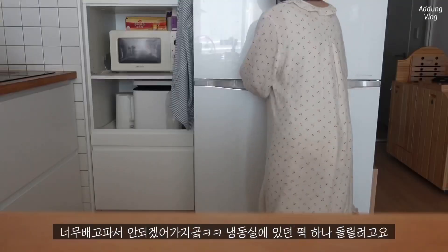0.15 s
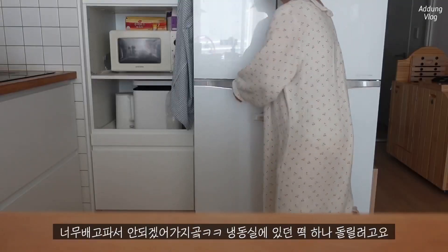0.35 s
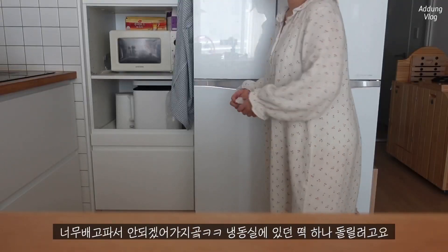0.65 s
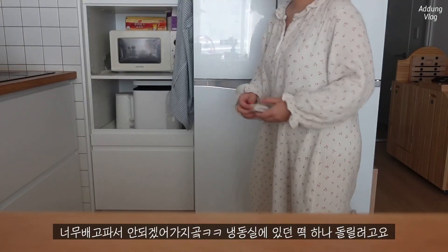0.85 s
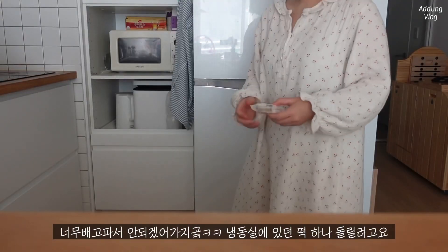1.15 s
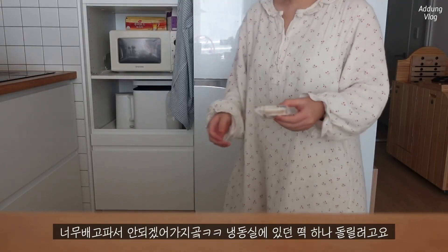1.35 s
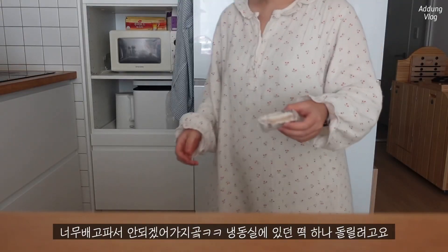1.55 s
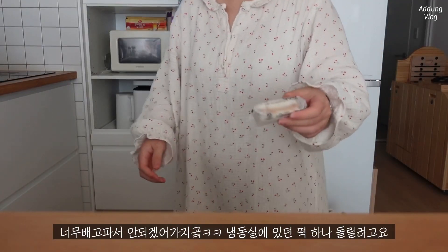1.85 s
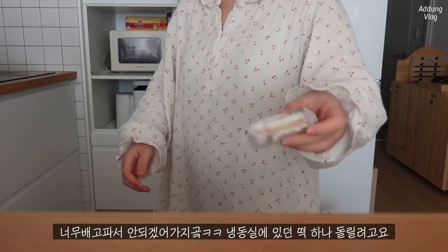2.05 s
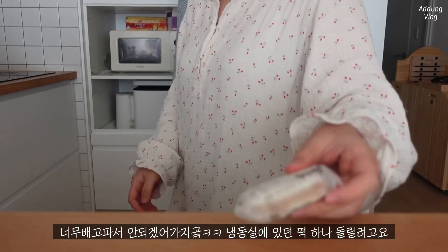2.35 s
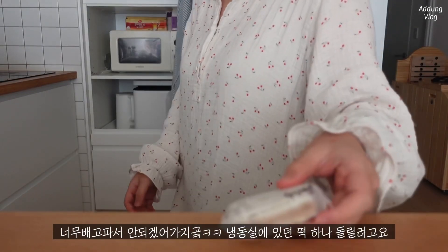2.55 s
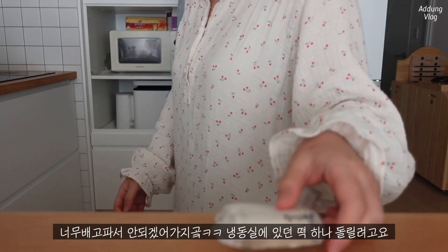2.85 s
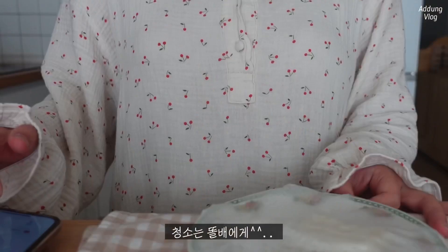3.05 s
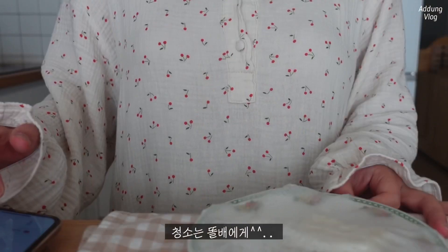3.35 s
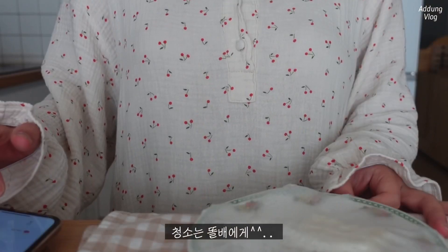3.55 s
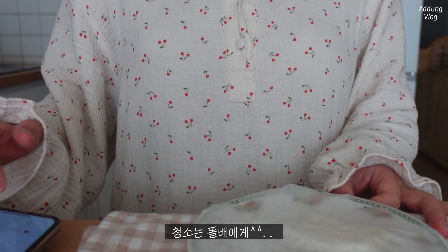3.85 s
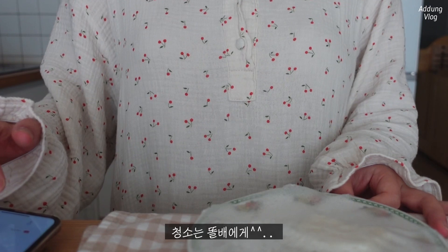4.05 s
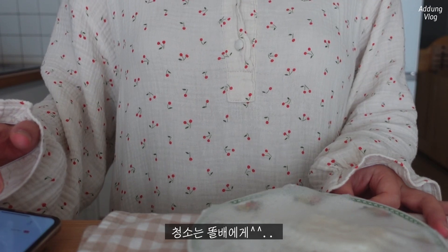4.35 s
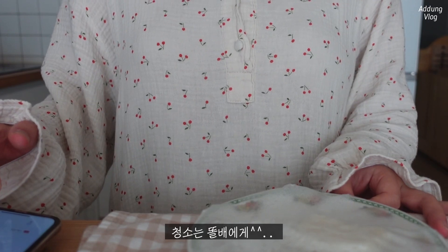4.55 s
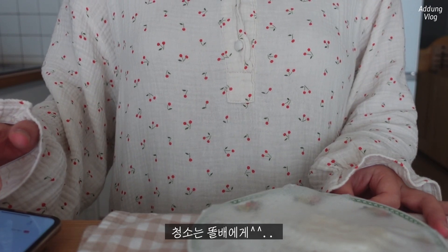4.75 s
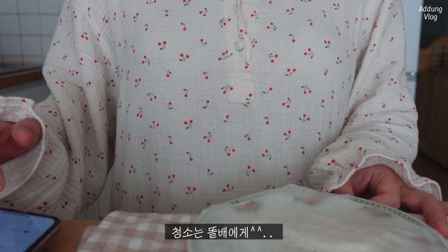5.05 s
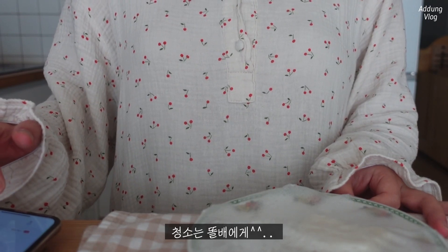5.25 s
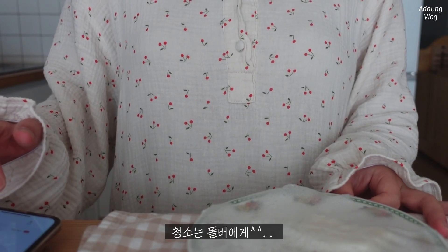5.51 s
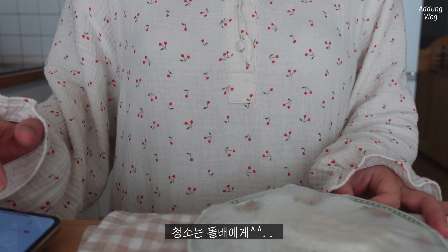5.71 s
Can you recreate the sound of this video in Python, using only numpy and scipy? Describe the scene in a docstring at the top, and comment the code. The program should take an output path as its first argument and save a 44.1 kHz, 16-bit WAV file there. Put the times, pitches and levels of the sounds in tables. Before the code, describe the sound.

The sound opens on the dying ring of a freezer door thud, low and slightly hollow, fading within about half a second into a soft fridge hum. Faint plastic ticks at 0.1-0.3 s lead to a brisk cluster of wrapper crackles and rustling from 0.65 to 1.1 s, densest around 1.0 s. Sparse light ticks follow until 1.7 s, then crisp snaps return, moving from slightly left to slightly right and closer. From 2.2 to 2.88 s they grow stronger, with faint dull packet knocks on a table and short room reflections; the sharpest snap comes at 2.88 s. At 2.95 s everything cuts to a robot vacuum already running: broad steady air rush, resonant motor hum and a thin, wavering high whine. It continues to the end near 6 s, with brief rougher brush surges around 5.05-5.7 s, strongest near 5.2-5.3 s.

```python
"""A kitchen: a freezer door has just thudded shut and its ring dies away over a fridge hum.
A plastic wrapper snaps and rustles in a hand: gritty bursts through resonances, over dense filtered crinkles.
Its packet knocks on the table as the snaps grow, and hard surfaces and a diffuse room answer them.
Then the scene switches at once to a robot vacuum already running: coloured noise for the air rush,
narrow noise bands for the ringing shell, sines for the fan whine, tones and rough bands for the brush."""
import sys
import numpy as np
from scipy import signal
from scipy.fft import rfft, irfft, next_fast_len
from scipy.io import wavfile

SR = 44100
rng = np.random.default_rng(int(sys.argv[2]) if len(sys.argv) > 2 else 0)


def inscribe(sig):
    """Save sig as 16-bit PCM at rate SR to the path in sys.argv[1].

    A 1-D sig is mono; a 2-D sig holds one channel per row.
    Samples are clipped to [-1, 1] before scaling.
    """
    pcm = np.round(np.clip(np.atleast_2d(sig).T, -1, 1) * 32767)
    wavfile.write(sys.argv[1], SR, pcm.astype(np.int16))


N = 259308

# how alike left and right are over pitch in the kitchen: pitch_hz, likeness (0 to 1)
KITCHEN_LIKENESS = [(40, 0.91), (80, 0.76), (240, 1), (950, 0.46), (3770, 0.39), (15000, 1)]
# how alike left and right are over pitch for the vacuum: pitch_hz, likeness (0 to 1)
VACUUM_LIKENESS = [(40, .97), (80, 0.63), (150, 0.96), (380, 0.99), (950, 0.9), (2380, 0.96), (5980, 0.75),
                   (9000, 0.2), (11500, 0.95), (13000, 1)]
# stereo lean of the vacuum over pitch: pitch_hz, left_over_right_db
VACUUM_SIDE = [(60, -0.5), (240, -0.5), (950, -2), (3770, -2), (15000, -1)]


def from_db(db):
    """Decibels to gain."""
    return 10 ** (np.asarray(db) / 20)


def rms_one(x):
    """Scale to unit rms."""
    return x / np.sqrt(np.mean(x ** 2) + 1e-20)


def in_time(rows):
    """Columns of a curve table (seconds first) at every sample."""
    s, *columns = np.transpose(rows)
    return [np.interp(np.arange(N) / SR, s, column) for column in columns]


def at_hz(points, hz):
    """A table over pitch read on a log-frequency axis."""
    table_hz, values = np.array(points).T
    return np.interp(np.log(hz), np.log(table_hz), values)


def pan(x, db):
    """Left louder than right by db."""
    return np.array([x * from_db(db / 2), x * from_db(-db / 2)])


def drift(corner_hz):
    """Slow random wander of spread 1: noise through two equal poles, at one value per 40 samples."""
    pole = np.exp(-80 * np.pi * corner_hz / SR)
    noise = rng.standard_normal(N // 40 + 2002)
    slow = signal.lfilter([1], [1, -2 * pole, pole * pole], noise)[2000:]   # skip the settling
    return np.interp(np.arange(N) / 40, np.arange(len(slow)), rms_one(slow))


def widen(mid, side, alike):
    """Mid and side to a left-right pair, from independent (0) to identical (1)."""
    return np.sqrt(1 + alike) * mid + np.sqrt(1 - alike) * side * np.array([[1], [-1]])


def colour(x, spectrum, likeness, balance=((100, 0), (1000, 0))):
    """Mid and side signals to a coloured stereo pair, alike in each band as the table says; rms 1."""
    size = next_fast_len(x.shape[1])
    hz = np.maximum(np.arange(size // 2 + 1) * SR / size, 1)
    mid, side = rfft(x, size) * from_db(at_hz(spectrum, hz))
    pair = widen(mid, side, np.clip(at_hz(likeness, hz), 0, 1))
    return rms_one(irfft(pair * pan(1, at_hz(balance, hz)), size)[:, :x.shape[1]])


def dying(x, t60s):
    """Overlapping octave slices of x, each fading with its own decay time, summed."""
    length = x.shape[1]
    out, t = 0, np.arange(length) / SR
    spectrum = rfft(x)
    octave = np.log2(np.maximum(np.arange(length // 2 + 1) * SR / length, 1))
    for k in range(4, 15):   # 16 Hz to 16 kHz
        share = np.clip(1 - np.abs(octave - k), 0, 1)
        out = out + irfft(spectrum * share, length) * from_db(-60 * t / at_hz(t60s, 2.0 ** k))
    return out


def whistle(hz, width_hz):
    """Noise twice through a narrow resonance of that width, as the vacuum's stereo pair; rms 1 before the lean."""
    pole = np.exp(-np.pi * width_hz / SR)
    a = [1, -2 * pole * np.cos(2 * np.pi * hz / SR), pole * pole]
    once = signal.lfilter([1, 0, -1], a, rng.standard_normal((2, N)))
    mid, side = signal.lfilter([1, 0, -1], a, once)
    pair = widen(mid, side, np.clip(at_hz(VACUUM_LIKENESS, hz), 0, 1))
    return rms_one(pair) * pan(1.0, at_hz(VACUUM_SIDE, hz))[:, None]


def snaps(edge_db):
    """A crease builds up and pops over: a gritty burst in a broad resonance, jolting the packet.
    Returns direct sound and room feed."""
    # wrapper snaps: start_s, peak_db, pitch_hz, width_octaves (at least .6), thump_db (packet against crease),
    # build_ms (at least .2 for the swell)
    snap_list = [(.134, -42, 2600, 1.5, -2, 2.2), (0.199, -48, 2550, 1.3, -14, 1.4),
                 (.279, -47, 3800, 1.6, -20, 8.5), (.658, -35, 2900, 1.4, -32, 1.0),
                 (0.6622, -33, 3150, 0.84, -10, 4.6), (.734, -43, 3640, 0.73, -8, 5.6),
                 (0.843, -30, 3860, 1.6, -29, 1.08), (0.8493, -32.5, 4800, 1.7, -26, 0.54),
                 (0.8927, -31, 6200, 1.7, -31, .8), (0.9372, -19, 3830, 1.5, -43, 0.94),
                 (0.9416, -22, 5500, 1.7, -30, 0.97), (0.948, -26, 4500, 1.7, -17, 1.0),
                 (0.9874, -19, 4640, 1.9, -10, 2.2), (.9945, -31, 4500, 1.8, -19, 5.7),
                 (.9994, -16.5, 3460, 1.2, -29, 0.51), (1.0175, -32, 4900, 1.1, -25, 1.3),
                 (1.0213, -16, 3230, 3.3, -32, 1.8), (1.027, -22, 4460, 1.7, -20, 0.9),
                 (1.0584, -19, 4000, 2.1, -27, .8), (1.0637, -23.5, 4470, 1.5, -15, 2.7),
                 (1.0799, -25.5, 4930, 0.57, -14, 1.1), (1.0858, -26, 5500, 1, -23, 1.5),
                 (1.092, -28, 5000, 1.2, -23, 1), (1.231, -41, 3480, 1.2, -16, 2),
                 (1.2616, -49, 2850, 0.74, -16, 2.1), (1.3332, -39.5, 1270, 0.92, -31, 1.54),
                 (1.396, -47, 7260, 0.76, -21, 1.2), (1.439, -32, 3200, 2.2, -10, 0.8),
                 (1.4455, -36, 3000, 2, -6, 0.8), (1.471, -34, 5230, 1.6, -30, .9),
                 (1.5701, -44.5, 3970, 1.6, 4, 0.84), (1.7164, -29, 5570, 1.5, -5, 0.81),
                 (1.722, -23.5, 3450, 1.4, -12, 0.97), (1.7828, -34.5, 6360, 0.91, -25, 0.92),
                 (1.806, -37, 5580, 1.2, -3, 0.64), (1.8206, -37, 5560, 0.74, -16, .6),
                 (1.852, -38, 3300, 1.22, -17, 0.58), (1.914, -40, 4970, 0.74, -26, 0.55),
                 (1.92, -44, 6500, .85, -23, .6), (2.0098, -33, 6200, 0.7, -22, 0.365),
                 (2.026, -41, 5300, 3.1, -5, 1.4), (2.0726, -20, 5200, 1.46, -16.5, 0.94),
                 (2.09, -27.5, 4730, 0.83, -2, 0.82), (2.173, -28.5, 4400, 2.4, -30, .8),
                 (2.2224, -18.5, 4570, 1.07, -44, .7), (2.314, -22.5, 4500, 2.2, -22, 0.61),
                 (2.45, -17, 6000, 1.03, -8, 0.7), (2.5448, -27, 4000, 2, -8, 0.7),
                 (2.5494, -29, 2290, 3.6, -26, 0.92), (2.573, -25.5, 4550, 0.72, -8, 0.67),
                 (2.5857, -28, 6620, 0.85, 6, .6), (2.594, -26, 2400, 1, 1, 1.03),
                 (2.5966, -21, 3770, 1.7, -8, 0.48), (2.6277, -17, 4640, 1.1, -6, 0.75),
                 (2.678, -33, 3000, 1, -29, 5.9), (2.687, -25, 2870, 1.64, -37, 1.37),
                 (2.7844, -27, 2800, 2.5, -5, 1.4), (2.8085, -31, 2400, 0.92, -12, 1.8),
                 (2.8153, -26.5, 2750, 1.35, -25, 0.87), (2.823, -38, 3000, 1.1, -25, 0.52),
                 (2.8766, -8.5, 3400, 2.0, -5, 0.45)]
    click_ms = 0.8   # snaps that build up slower than this lose their click
    grit = 0.15      # noise around each click, against the click
    direct, feed = np.zeros((2, N))
    ms = np.arange(1800) / SR * 1000
    packet = signal.butter(2, [1540, 2490], "band", fs=SR, output="sos")
    crack = signal.butter(2, 8660, "high", fs=SR, output="sos")
    noises = rng.standard_normal((len(snap_list), len(ms)))
    for (s, db, hz, octaves, thump_db, build_ms), noise in zip(snap_list, noises):
        edges_hz = np.clip(hz * 2 ** (np.array([-.5, .5]) * max(octaves, .6)), 100, .45 * SR)
        crease = signal.butter(2, edges_hz, "band", fs=SR, output="sos")

        def resonate(x):
            """Crease and packet ring together."""
            thump = from_db(thump_db) * rms_one(signal.sosfilt(packet, x))
            return rms_one(signal.sosfilt(crease, x)) + thump

        grown = ms / max(build_ms, .2)
        swell = grown * np.exp(1 - grown)   # rises to 1 when the build-up is over, then sinks
        click = 1. * (np.arange(len(ms)) == np.argmax(grown >= 1))
        click_share = min(click_ms / build_ms, 1)
        pop = resonate(click_share * click + grit * noise * swell ** 1.5)
        pop *= from_db(db) / np.abs(pop).max()
        edge = signal.sosfilt(crack, click + grit * noise * swell ** 4)

        at = round(s * SR)
        edge_gain = click_share * from_db(db + edge_db[at])
        direct[at:at + len(ms)] += pop + edge_gain * edge / np.abs(edge).max()
        # all directions together carry a smoother spectrum than the direct path
        feed[at:at + len(ms)] += rms_one(resonate(click)) * np.std(pop) + .5 * pop
    return direct, feed


def rustle():
    """Dense uneven crinkles of the film: random impulses whose density wanders, so they come in clumps."""
    # wrapper rustle: time_s, level_db
    rustle_level = [(0, -54), (0.61, -86), (0.71, -54.5), (0.84, -63), (0.89, -59), (0.94, -50),
                    (0.98, -38.5), (1.03, -39), (1.09, -42), (1.24, -60.5), (1.5, -74), (1.8, -54),
                    (1.94, -67.5), (2.18, -55), (2.55, -70), (2.79, -58), (2.95, -60)]
    # colour of the wrapper film: pitch_hz, level_db (per Hz, relative)
    film_spectrum = [(240, -37.5), (400, 0), (620, 0.5), (1070, 12), (1560, 3.5), (2180, 5), (6240, 3.5),
                     (12700, -9), (16000, -19)]
    crinkles_per_s = 2000   # before the clumping
    sizes = from_db(3.5 * np.minimum(rng.exponential(1, (2, N)), 3)) * rng.choice([-1, 1], (2, N))
    born = rng.random((2, N)) < crinkles_per_s * from_db(4.5 * drift(30)) / SR
    grains = rms_one(sizes * born) + 0.1 * rng.standard_normal((2, N))
    film = colour(grains, film_spectrum, [(1000, 0.82), (8000, 1.0)], [(1000, -1), (8000, -1)])
    return from_db(in_time(rustle_level)[0]) * film


def knocks():
    """The packet touches the table: a short dull push into the table top."""
    # knocks: start_s, peak_db
    knock_list = [(2.224, -47), (2.315, -46), (2.4497, -43), (2.595, -39), (2.6295, -44), (2.787, -44),
                  (2.877, -47)]
    out, ms = np.zeros(N), np.arange(1200) / SR * 1000
    table = signal.butter(2, [280, 620], "band", fs=SR, output="sos")
    for (s, db), noise in zip(knock_list, rng.standard_normal((len(knock_list), len(ms)))):
        push = (ms == 0) + 0.31 * noise * np.exp(-ms / 4)   # a click and 4 ms of fading noise
        knock = signal.sosfilt(table, push)
        at = round(s * SR)
        out[at:at + len(ms)] += from_db(db) * knock / np.abs(knock).max()
    return out


def echoes(x):
    """Table and fridge door throw each snap back a few times."""
    # echoes, one list for left and one for right: delay_ms, level_db
    echo_taps = [
        [(2.1, -14), (6.3, -12), (16.5, -14)],
        [(2.6, -15), (6.0, -13), (18.2, -14)],
    ]
    out = np.zeros((2, N))
    for side, taps in zip(out, echo_taps):
        for delay_ms, db in taps:
            lag = round(delay_ms * SR / 1000)
            side[lag:] += from_db(db) * x[:-lag]
    return out


def room(x, alike):
    """Diffuse tail of unit energy: noise that dies at its own pace in each octave after the first echo."""
    # decay of the kitchen: pitch_hz, t60_s (before the early lift)
    room_decay = [(500, 0.78), (2000, 0.23), (6000, 0.43), (14000, 0.41)]
    early_db, early_s, first_echo_s = 8, .03, .005   # near walls lift the start of the tail
    mid, side = rng.standard_normal((2, SR // 2))
    tail = dying(widen(mid, side, alike), room_decay)
    tail = tail * from_db(early_db * np.exp(-np.arange(SR // 2) / SR / early_s))
    tail = tail / np.sqrt(np.sum(tail ** 2) / 2)
    tail = np.pad(tail, ((0, 0), (round(first_echo_s * SR), 0)))
    return signal.fftconvolve(x[None], tail, axes=1)[:, :N]


def door():
    """What is left of the thud rings on in the door and dies away in the kitchen: fading noise and sines."""
    # colour of the thud: pitch_hz, level_db (per Hz, relative)
    thud_spectrum = [(35, -52.5), (60, -22), (108, -26), (180, -8.5), (244, -5), (363, -2.5), (666, -6.5),
                     (1550, -6), (1660, -9), (2770, -6), (14600, -42), (16000, -86.5)]
    # decay of the thud: pitch_hz, t60_s
    thud_decay = [(100, 1), (300, 0.42), (1000, 0.5), (3000, 0.16), (10000, 0.36)]
    # door and shelves ring: pitch_hz, peak_db (before the soft onset), t60_s
    ring_modes = [(154.5, -39.5, 0.41), (187.7, -30, 0.24), (263, -36, 0.42), (291, -37, 0.4),
                  (370, -38, 0.4), (461, -40, 0.48), (544, -39, 0.4), (614, -36.5, 0.45), (700, -40, 0.42),
                  (930, -39.5, 0.49), (1244, -42, 0.27), (1794, -35, 0.27), (2370, -43, 0.17)]
    t = np.arange(SR) / SR
    noise = colour(rng.standard_normal((2, SR)), thud_spectrum, KITCHEN_LIKENESS)
    thud = from_db(-26.5) * dying(noise, thud_decay)
    ring = sum(from_db(db - 60 * t / t60) * rng.choice([-1, 1]) * np.sin(2 * np.pi * hz * t)
               for hz, db, t60 in ring_modes)
    ring = ring * (1 - np.exp(-t / .004))   # soft onset
    return np.pad(thud + ring, ((0, 0), (0, N - SR)))


def fridge_hum():
    """Fridge and room tone: coloured noise of gently wandering level."""
    # colour of the hum: pitch_hz, level_db (per Hz, relative)
    hum_spectrum = [(25, -30), (60, -32), (90, -18.5), (130, -19.5), (161, -4), (293, -2), (340, 0.5),
                    (410, -10.5), (550, -11.5), (1000, -18.5), (2150, -21), (2500, -32), (6000, -36.5),
                    (16000, -41)]
    noise = rng.standard_normal((2, N))
    hum = colour(noise, hum_spectrum, KITCHEN_LIKENESS, [(100, -.6), (1000, -.6)])
    return from_db(-55 + 1.2 * drift(25.0)) * hum


def kitchen():
    """Wrapper and table in the moving hand, their room, the door and the fridge hum."""
    # the hand comes nearer and to the right:
    # time_s, left_over_right_db, room_db (gain into the room), edge_db (bright edge against each snap's peak)
    hand_path = [(0, 3, -4.5, -4), (1.8, -1.5, 1.5, -8), (2.1, -3.5, -4.5, 1.5), (2.5, -3, -4, -6),
                 (2.9, -2, -10, -18)]
    side_db, room_db, edge_db = in_time(hand_path)
    direct, feed = snaps(edge_db)
    feed = feed * from_db(room_db)
    in_hand = pan(direct + knocks(), side_db)
    return in_hand + echoes(feed) + room(feed, alike=.8) + rustle() + door() + fridge_hum()


def rippled(x):
    """Standing waves of the room make the air rush uneven: a fixed random gain over pitch."""
    ripple_db, spacing_hz = 1.1, 18
    knots_hz = np.arange(0, SR / 2 + spacing_hz, spacing_hz)
    hz = np.arange(N // 2 + 1) * SR / N
    gain_db = ripple_db * np.interp(hz, knots_hz, rng.standard_normal(len(knots_hz)))
    return irfft(rfft(x) * from_db(gain_db), N)


def air_rush():
    """Air rushing through the shell: coloured noise of slightly unsteady level."""
    # colour of the air: pitch_hz, level_db (per Hz, relative)
    air_spectrum = [(25, -47), (60, -42), (80, -35.5), (130, -27), (160, -13.5), (260, -8.5), (480, -8.5),
                    (700, -6.5), (1200, -4.5), (2160, -7), (3160, -8), (3430, -10), (4500, -10),
                    (8600, -20.5), (16000, -44)]
    air = colour(rng.standard_normal((2, N)), air_spectrum, VACUUM_LIKENESS, VACUUM_SIDE)
    return rippled(air) * from_db(-33.5 + .5 * drift(18))


def shell():
    """Shell and floor resonances excited by the air: narrow noise bands of wandering level."""
    # resonances: pitch_hz, width_hz (of one filter pass), level_db (mean)
    shell_modes = [(354, 72, -45), (300, 17, -53), (435.8, 26.5, -51.5), (456.8, 6.5, -53.5),
                   (629, 24, -50.5), (699, 11, -54.5), (717, 11, -52.5), (861, 22, -61), (915, 8.7, -55),
                   (1162, 19, -71.5), (2920, 450, -47.5), (10110, 1150, -52)]
    return sum(from_db(db + 0.66 * drift(2.0)) * whistle(hz, width_hz) for hz, width_hz, db in shell_modes)


def fan():
    """One tone per shaft turn, one per blade passage and its octave."""
    # fan whine, wavering in pitch and level: time_s, blade_hz (before a small random wander), level_db
    whine_curve = [(2.96, 3226, -40), (3.08, 3228, -44), (3.14, 3240, -52), (3.19, 3243, -42.5),
                   (3.73, 3237, -44), (3.78, 3237, -40), (4.25, 3243, -52), (4.34, 3253, -42),
                   (4.55, 3247, -52), (4.88, 3239, -54), (4.94, 3240, -44), (5.11, 3241, -45),
                   (5.28, 3247, -39.5), (5.54, 3245, -52), (5.68, 3246, -46), (5.74, 3248, -56),
                   (5.88, 3250, -47)]
    blade_count = 12
    blade_hz, blade_db = in_time(whine_curve)
    turn = 2 * np.pi * np.cumsum(blade_hz + 2.5 * drift(20)) / SR / blade_count
    shaft = from_db(-50.5 + 2.2 * drift(4)) * np.sin(turn)
    blades = np.sin(blade_count * turn) + from_db(-16) * np.sin(2 * blade_count * turn)
    return np.sqrt(2) * (pan(shaft, -0.55) + pan(blades * from_db(blade_db), -3.2))


def brush_load():
    """The brush catches on the floor: each catch loads it at once, holds, and lets go."""
    # catches: start_s, hold_s, load_db (motor and bristles each follow it by their own share)
    catch_list = [(2.95, .05, 3), (3.09, .03, 4), (5.05, .02, 2), (5.168, .04, 10), (5.215, .08, 7.5),
                  (5.303, .03, 9), (5.425, .02, 3), (5.54, .04, 5), (5.66, .03, 5)]
    attack_s, release_s = .003, .006
    load_db = np.zeros(N)
    for s, hold_s, db in catch_list:
        full_s = s + attack_s
        free_s = full_s + hold_s
        load_db += db * in_time([(s, 0), (full_s, 1), (free_s, 1), (free_s + release_s, 0)])[0]
    return load_db


def brush():
    """Motor orders, each a thin tone in a rough band, and bristle scrub swell as the brush meets resistance."""
    # brush motor orders, levels without load or flicker:
    # multiple (of the turning rate), band_db, width_hz (of one filter pass), tone_db
    motor_orders = [(4, -51, 40, -55), (5, -44, 80, -58), (6, -52, 90, -64), (7, -49.5, 80, -59),
                    (8, -65, 15, -59), (10, -50, 110, -64)]
    brush_hz = 259.6
    load_db = brush_load()
    turn = 2 * np.pi * np.cumsum(brush_hz + .6 * drift(3)) / SR
    orders = 0
    for k, db, width_hz, tone_db in motor_orders:
        band = from_db(db) * whistle(k * brush_hz, width_hz)
        tone = np.sqrt(2) * from_db(tone_db) * np.sin(k * turn)
        flicker = from_db(1.6 * drift(18))   # each order flickers on its own
        orders = orders + flicker * (band + pan(tone, at_hz(VACUUM_SIDE, k * brush_hz)))
    scrub = whistle(1650, 600) * from_db(-52 + 1.5 * load_db)   # bristles
    return orders * from_db(.7 * load_db) + scrub


def vacuum():
    """Air rush, ringing shell, fan and brush."""
    return air_rush() + shell() + fan() + brush()


def scene():
    """The kitchen gives way to the vacuum in a few milliseconds."""
    switch_s, fade_s = 2.9545, 0.003
    over = np.clip((np.arange(N) / SR - switch_s) / fade_s, 0, 1)
    return kitchen() * (1 - over) + vacuum() * over


def record(dry):
    """The top is cut: a steep low-pass, 70 dB down from 16.5 kHz."""
    return signal.sosfilt(signal.cheby2(14, 70, 16500, fs=SR, output="sos"), dry)


dry = scene()
out = record(dry)
inscribe(out)
```